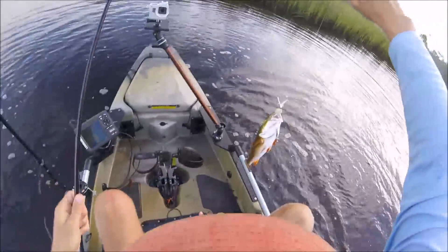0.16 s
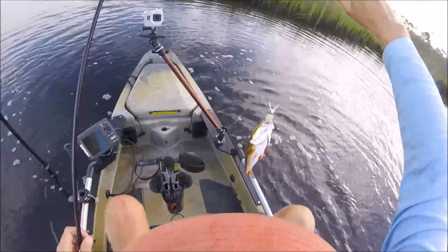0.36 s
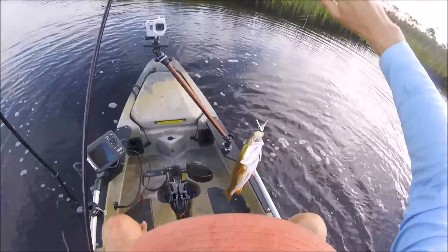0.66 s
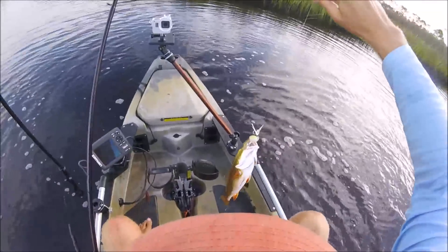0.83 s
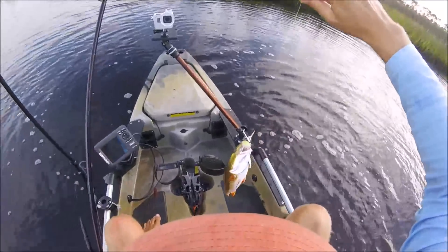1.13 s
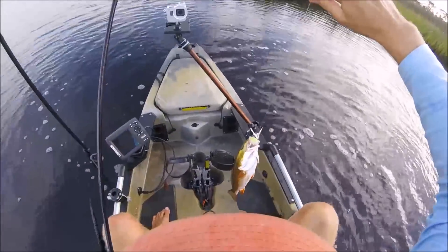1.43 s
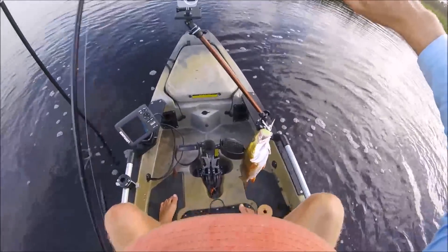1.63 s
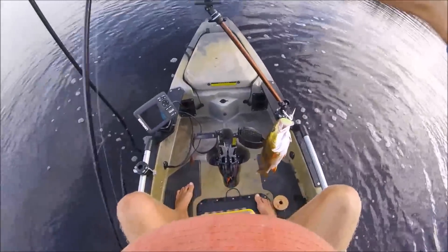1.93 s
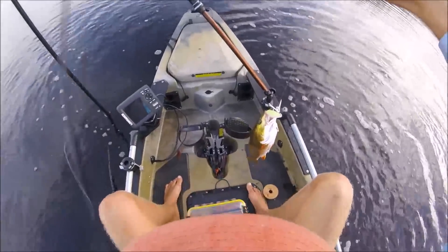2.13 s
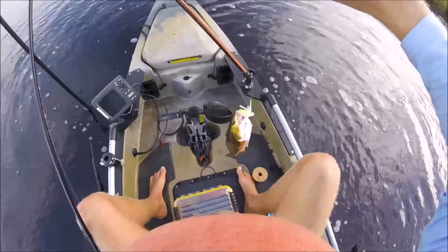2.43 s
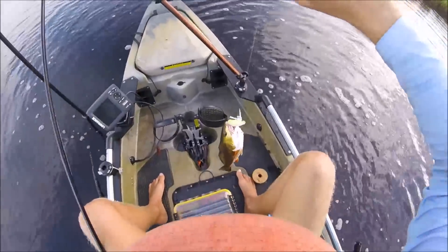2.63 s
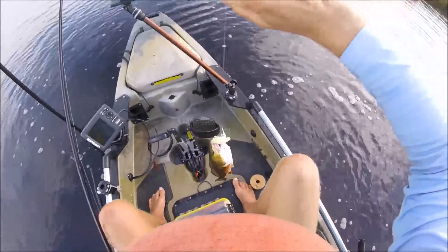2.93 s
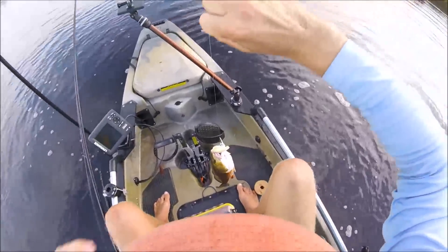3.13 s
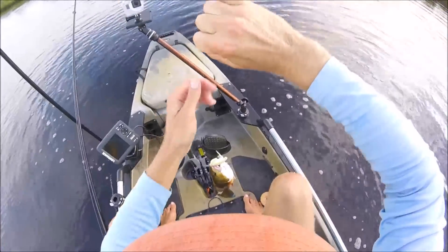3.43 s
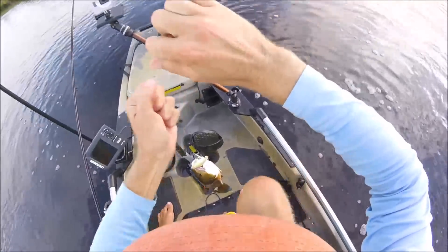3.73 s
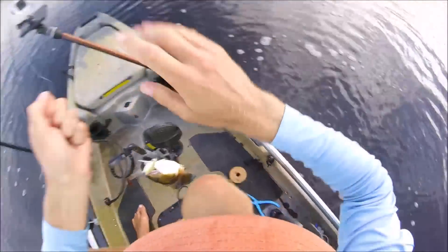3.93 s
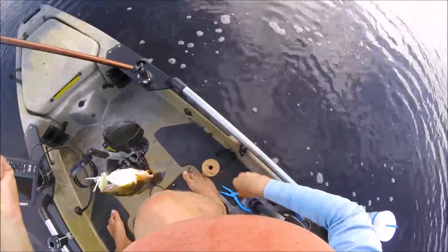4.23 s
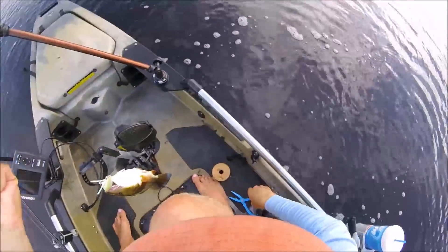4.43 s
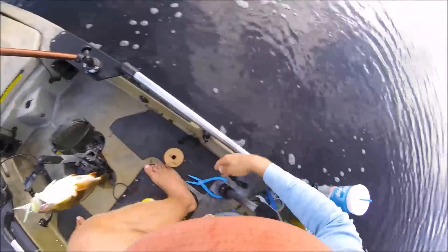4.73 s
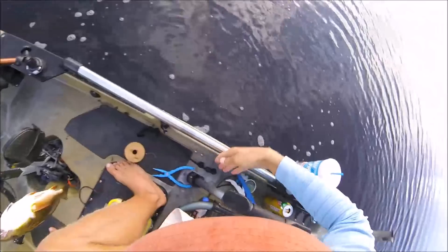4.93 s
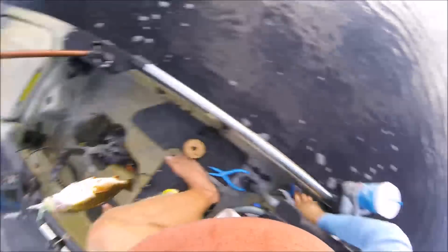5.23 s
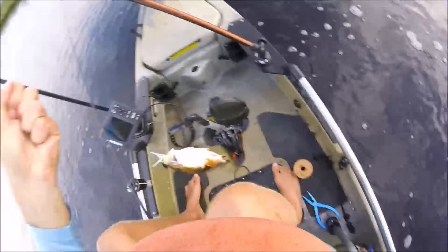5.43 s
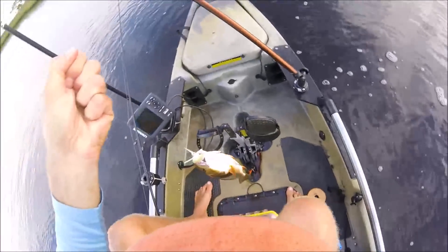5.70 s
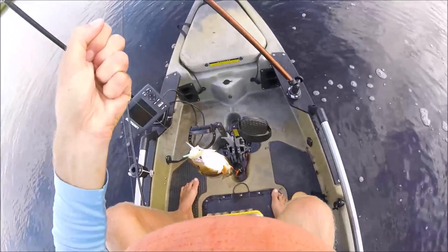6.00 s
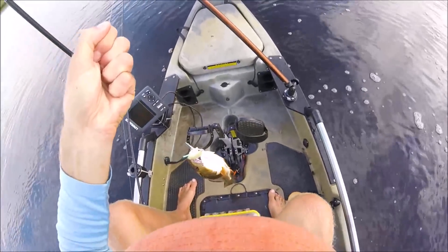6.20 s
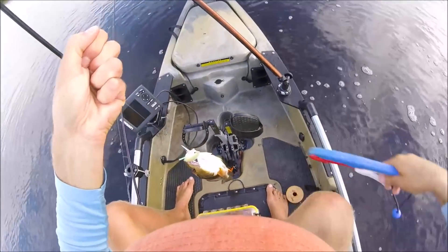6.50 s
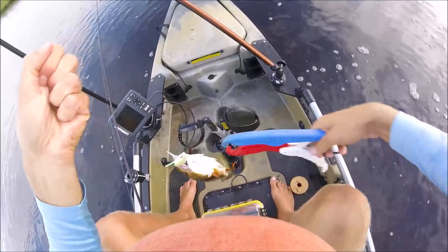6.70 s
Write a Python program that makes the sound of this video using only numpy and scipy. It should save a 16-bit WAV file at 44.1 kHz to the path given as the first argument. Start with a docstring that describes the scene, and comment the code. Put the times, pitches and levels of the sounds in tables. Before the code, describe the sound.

A close, dry mono camera microphone on a plastic kayak outdoors. Low wind rumble comes and goes in uneven gusts, with fluttering buffets, strong near 0.3, 1.8, 3.5 and 5.3 seconds, over a faint steady hiss. From 0.05 to 0.5 s, tackle raps and soft fleshy thumps shake the hollow hull, with scuffs and tiny steel tinkles. It is mostly windy until a small clack at 1.7, then another cluster of thumps, gritty slides and light jingling from 1.87 to 2.6. Sparse faint knocks follow to 3.4. At 4.0 to 4.4 comes the heaviest bumping, deep and hollow, with a dragging scuff. Lighter knocks and short scuffs run from 5.57 to 5.95. At 6.01 a hard, bright plastic clack raps the hull; at 6.25 a steel fitting gives a clear high beating ting. A faint click at 6.5 and tiny ticks near 6.7 end it under quiet rumble and hiss.

```python
"""A fish, feet and tackle knock and scuff the hollow hull of a plastic kayak: rough forces ring its resonances.
Some blows leave a short clear note, a damped sine. A small steel fitting tinkles with close modes that beat,
and a stiff plastic piece clacks through narrow modes under a bright snap. Gusts buffet the microphone port
of a camera in its housing: filtered noise makes rumble and flutter, single pressure swings make the buffets.
Its preamp hisses: coloured noise, nearly steady. The very top of the treble is cut."""
import sys
import numpy as np
from scipy import signal
from scipy.fft import rfft, irfft, next_fast_len
from scipy.io import wavfile
from scipy.ndimage import uniform_filter1d

SR = 44100
rng = np.random.default_rng(int(sys.argv[2]) if len(sys.argv) > 2 else 0)


def to_wav(s):
    """Save 16-bit WAV."""
    ch = np.atleast_2d(s).T  # columns
    pcm = np.round(np.clip(ch, -1, 1) * 32767)  # PCM
    wavfile.write(sys.argv[1], SR, pcm.astype(np.int16))


N = 302465  # length in samples


def undb(db):
    """Decibels to gain."""
    return 10 ** (np.asarray(db) / 20)


def unit(x):
    """Scale to rms 1."""
    return x / np.sqrt(np.mean(x ** 2))


def noise():
    """White noise over the whole scene."""
    return rng.standard_normal(N)


def band(x, hz, width_hz):
    """One resonance, gain 1 at its centre."""
    return signal.lfilter(*signal.iirpeak(hz, hz / width_hz, SR), x)


def track(rows, column):
    """A table column at every sample, in straight lines between the rows."""
    rows = np.array(rows)
    return np.interp(np.arange(N) / SR, rows[:, 0], rows[:, column])


def walk(rate):
    """Random levels of rms 1, held 1 / rate seconds and smoothed twice."""
    k = int(SR / rate)
    steps = np.repeat(rng.standard_normal(N // k + 1), k)
    smooth = uniform_filter1d(uniform_filter1d(steps, k), k)
    return unit(smooth[:N])


# How the wind comes and goes.
# Each row: time in seconds, rumble level in dB, flutter level relative to the rumble in dB.
GUST_LEVELS = [(0, -39, -10.5), (0.25, -32.5, 0.5), (0.6, -48, -9), (0.95, -41, -23.5), (1.4, -36, -16.5),
               (1.85, -33, -10), (2.35, -38.5, 0), (2.78, -44, -21.5), (3.0, -33.5, -21.5),
               (3.2, -51, -4.5), (3.6, -33, -30.5), (4.0, -45.5, -36), (4.3, -37.5, -6), (4.55, -47, -12),
               (5.08, -48, -25), (5.16, -43.5, 4), (5.33, -33.5, -2), (5.46, -41, -5.5), (5.56, -42.5, -54),
               (6.86, -44, -42)]
EDDY_DB, EDDY_SPREAD_DB = -1, 4  # chance eddies: least level over the rumble, and its spread
EDDY_LOW_HZ, EDDY_OCTAVES = 40, 1.71  # lowest pitch, and the range above it
EDDY_TAIL = .85  # under 1, so that there is a limit to how strong a chance eddy can be


def eddies(count):
    """Chance buffets that follow the gust of the moment: rows of seconds, level in dB, pitch in Hz."""
    when, size, pitch = rng.random((count, 3)).T
    s = when * (N - 1) / SR
    gust_db = track(GUST_LEVELS, column=1)[(s * SR).astype(int)]
    db = gust_db + EDDY_DB - EDDY_SPREAD_DB * np.log(1 - EDDY_TAIL * size)
    return list(zip(s, db, EDDY_LOW_HZ * 2 ** (EDDY_OCTAVES * pitch)))


# The strongest buffets of air on the port.
# Each row: time of the swing's middle in seconds, level in dB before the skew, pitch in Hz.
STRONG_BUFFETS = [(0.076, -25, 81.6), (0.256, -16, 61.7), (0.279, -16.5, 52), (0.825, -27, 48),
                  (1.178, -32, 68), (1.240, -31, 74), (1.317, -22, 93), (1.390, -22, 97),
                  (1.565, -21, 46.7), (1.644, -26, 52.7), (1.716, -22.5, 58.7), (1.777, -27, 97),
                  (1.784, -19.5, 70.6), (1.829, -27.5, 75.4), (2.29, -23.5, 128), (2.385, -28, 50.3),
                  (2.976, -25.5, 48), (3.06, -31, 44), (3.53, -12.5, 67), (3.64, -19, 62.5),
                  (4.289, -23.5, 67), (4.416, -30, 82), (5.167, -27, 92), (5.238, -34.5, 80),
                  (5.280, -28, 80), (5.303, -21, 95), (5.322, -24, 105), (5.333, -20.5, 133),
                  (5.37, -29, 99.5), (5.415, -26, 94), (6.401, -29.5, 61), (6.607, -31, 36.4)]
BUFFET_RISE, BUFFET_FALL = 0.35, 0.68  # in cycles
PORT_SKEW = 2.5  # strong pressure swings come out peaked on one side (per unit of pressure)


def wind():
    """Turbulence at the port: lumpy rumble, a flutter above it and single pressure buffets."""
    rumble = unit(band(noise(), 29.7, 26.5) * undb(4.64 * walk(14)))
    rumble = unit(band(band(rumble, 42., 110.), 42., 110.))
    flutter = unit(band(noise(), 100.0, 116.0) * undb(4.2 * walk(40)))
    flutter = unit(band(band(flutter, 127.0, 222.0), 127.0, 222.0))
    gust = undb(track(GUST_LEVELS, column=1))
    pressure = gust * (rumble + undb(track(GUST_LEVELS, column=2)) * flutter)
    for s, db, hz in STRONG_BUFFETS + eddies(count=70):
        # an eddy passes: about one and a half swings of pressure, sudden at the front
        t = np.arange(-SR // 20, SR // 20) / SR
        i = int(s * SR) - SR // 20
        shape = np.exp(-(t * hz / np.where(t < 0, BUFFET_RISE, BUFFET_FALL)) ** 2)
        swing = -undb(db) * np.cos(2 * np.pi * hz * t) * shape
        lo, hi = max(i, 0), min(i + len(t), N)
        pressure[lo:hi] += swing[lo - i:hi - i]
    peaked = pressure ** 2
    return pressure + PORT_SKEW * (peaked - uniform_filter1d(peaked, size=SR // 25))


# The colour of the hiss. Each row: frequency in Hz, relative level in dB per Hz.
HISS_COLOUR = [(59, 0.5), (100, -10.5), (295, -16), (625, -20.5), (2130, -26.5), (4160, -35), (5340, -35),
               (6300, -14), (7000, -26), (8800, -29), (10400, -38.5), (12000, -34.5), (14500, -48)]
HISS_DB = -62


def hiss():
    """Nearly steady microphone and preamp noise, lifted where the housing port resonates."""
    hz, db = np.transpose(HISS_COLOUR)
    size = next_fast_len(N)
    grid = np.arange(size // 2 + 1) * SR / size + 1  # 1 Hz up, to keep the logarithm finite
    colour = undb(np.interp(np.log(grid), np.log(hz), db, -120, -120))
    coloured = irfft(rfft(rng.standard_normal(size)) * colour, size)[:N]
    return undb(HISS_DB + 0.5 * walk(4.0)) * unit(coloured)


AFTER_DB, AFTER_S = -30.5, 0.037  # a faint shudder goes on after each blow


def contacts(times, dbs, lengths):
    """Force of each blow: a hard first touch, a chatter that swells quickly and dies away, a faint shudder."""
    force = np.zeros(N)
    for s, db, length in zip(times, dbs, lengths):
        i = int(s * SR)
        t = np.arange(min(SR // 6, N - i)) / SR
        chatter = (1 - np.exp(-t / (0.18 * length))) * np.exp(-t / length)
        touch = 1.16 * np.exp(-t / 0.00036)
        shudder = undb(AFTER_DB) * np.exp(-t / AFTER_S)
        force[i:i + len(t)] += undb(db) * (chatter + touch + shudder)
    return force


def swells(start, hold, db, rise_db_s, fall_db_s):
    """Gain of gestures that rise to their start, hold and fall away."""
    t = np.arange(N)[:, None] / SR
    rise_db = rise_db_s * np.maximum(start - t, 0)
    fall_db = fall_db_s * np.maximum(t - start - hold, 0)
    return undb(db - rise_db - fall_db).sum(axis=1)


SLIPS_PER_S, SLIP_SPREAD_DB, SLIP_S = 450, 4, 0.0023  # grabs: average rate, spread of strength, decay time


def slips():
    """Stick-slip force: separate short grabs, a few of them large; rms 1."""
    when, size = rng.random((2, N))
    grabs = (when < SLIPS_PER_S / SR) * undb(-SLIP_SPREAD_DB * np.log(1 - .98 * size))
    return unit(signal.lfilter([1], [1, -np.exp(-1 / (SLIP_S * SR))], grabs))


# Fish and feet thump the deck. Each row: time in seconds, deck strength in dB,
# hollow body minus deck in dB, crack minus deck in dB, basic chatter time in seconds.
FLESH_THUMPS = [(0.121, -54, 17, -2, 0.013), (0.176, -45, 17, -17, 0.004), (0.241, -34, 1, -20, 0.0053),
                (0.257, -29.5, -17, -3.5, 0.0074), (0.291, -21, -7.5, -6.5, 0.011),
                (0.436, -38.5, -7, -16, 0.02), (0.473, -25.5, -0.5, -12.5, 0.0089),
                (0.49, -29.5, 6.5, -12, 0.0024), (1.62, -42, -1.5, -4.5, 0.013),
                (1.875, -28, 2.5, -6.5, 0.014), (1.974, -42.5, 0, -1.5, 0.018),
                (1.995, -52, 18.5, 2, 0.017), (2.019, -39, -4, -9, 0.0025), (2.167, -35, 2, 4.5, 0.0069),
                (2.179, -32, 7, 3, 0.013), (2.222, -36.5, 6, -15, 0.019), (2.247, -25, -24, -1.5, 0.0074),
                (2.428, -33.5, -3.5, 0.5, 0.0052), (2.694, -61, 20.5, 1, 0.024),
                (2.891, -43, -1, -33, 0.017), (2.985, -48.5, 9, -2, 0.015), (3.281, -51, 4.5, -16, 0.015),
                (3.353, -44.5, 3, -14, 0.0099), (4.007, -47, 16, 5, 0.022), (4.078, -35, 7.5, -2.5, 0.0049),
                (4.107, -23, -1, -35, 0.0045), (4.113, -21, -2, 0, 0.01), (4.178, -28.5, 6, -21, 0.0076),
                (4.206, -32, -7, -29, 0.0089), (4.25, -30, -18, -28, 0.004), (4.274, -30.5, -9, -13, 0.011),
                (4.325, -39, 3.5, -21, 0.0044), (4.372, -33, -5.5, -12, 0.012),
                (4.4, -36, 6.5, -16, 0.0046), (4.545, -45, -12, -4, 0.012), (4.679, -47, -6.5, -8, 0.012),
                (5.57, -54, 19, -8, 0.0049), (5.578, -38, -1, -18, 0.0086), (5.628, -30.5, -2, -29, 0.008),
                (5.657, -42.5, -2, -7.5, 0.003), (5.754, -38, -1, -25, 0.012),
                (5.905, -41.5, -2, -30, 0.01), (5.916, -39.5, -9, -22, 0.0084),
                (5.938, -45, 10.5, -24, 0.0032)]
THUMP_SPOT_HZ = 730  # soft flesh lands on the broad middle of a plate
# Hard tackle raps the hull. Each row: time in seconds, deck strength in dB,
# crack minus deck in dB, pitch of the struck spot in Hz, basic chatter time in seconds.
TACKLE_RAPS = [(0.06, -27.5, -3, 1020, 0.0055), (0.148, -44, 3, 6300, 0.01), (0.206, -48, 1, 4640, 0.029),
               (0.34, -41, -5, 4500, 0.0087), (1.187, -43, -11, 1380, 0.0065),
               (1.703, -47.5, 2, 1140, 0.014), (1.756, -45.5, -14, 680, 0.0048),
               (1.866, -26.5, -2, 7740, 0.0062), (2.278, -52, 14, 654, 0.0077),
               (2.299, -48, -4, 1080, 0.0057), (2.435, -39.5, 1.5, 5540, 0.0085),
               (2.495, -50.5, 0, 4480, 0.0071), (2.567, -46, 4.5, 1930, 0.0067),
               (2.734, -47, -1.5, 5900, 0.0072), (3.183, -56, 3, 4300, 0.015),
               (4.025, -39.5, -1, 830, 0.0054), (4.188, -24, -17, 785, 0.0091),
               (5.597, -26, -14, 2740, 0.0067), (5.704, -40.5, -4, 720, 0.01),
               (5.734, -43, -18, 1070, 0.0059), (6.014, -18.5, -1, 790, 0.0094),
               (6.249, -27, 1, 4180, 0.0074), (6.526, -64, 13, 5500, 0.0085)]
RAP_BODY_DB = -4.5  # hollow body minus deck


def knocks():
    """Thumps and raps as one list: s, deck dB, body dB, crack dB, spot Hz, chatter s, hard (0 or 1)."""
    thumps = [(s, db, body, crack, THUMP_SPOT_HZ, chatter, 0) for s, db, body, crack, chatter in FLESH_THUMPS]
    raps = [(s, db, RAP_BODY_DB, crack, hz, chatter, 1) for s, db, crack, hz, chatter in TACKLE_RAPS]
    return np.transpose(thumps + raps)


def ring(modes, s, db, chatter, spot_hz, rub, favour_db=13.0, reach=0.23, strike_db=12.5):
    """A blow favours modes near the pitch of its spot: one clean strike for all, a rough force for each."""
    total = np.sqrt(sum(undb(mode_db) ** 2 * width / SR for _, width, mode_db in modes))
    out = 0
    for hz, width, mode_db in modes:
        felt_db = db + favour_db * np.exp(-(np.log(hz / spot_hz) / reach) ** 2)
        force = (contacts(s, felt_db, chatter) + rub) * noise()
        force[(s * SR).astype(int)] += undb(felt_db + strike_db)
        # a wide second pass keeps the flanks steep
        out = out + undb(mode_db) * band(band(force, hz, width), hz, 0.5 * hz)
    return out / total


# Resonances of the hollow body, the deck plates and their bright edges.
# Each row: frequency in Hz, width in Hz, relative level in dB.
BODY_MODES = [(185.3, 142, 9), (269, 27, 5), (310, 82, 4.5), (464, 178, 1), (501.5, 107, 0.5),
              (592, 690, -9.5)]
DECK_MODES = [(779, 85, 1), (996, 690, 3), (1230, 36, -3.5), (1693, 760, -1.5), (1956, 88, -3.5)]
EDGE_MODES = [(2460, 650, 10), (3090, 1500, 10.5), (3640, 1400, -11.5), (4950, 710, 12), (5600, 460, 12.5),
              (6335, 390, 15.5), (7740, 800, -2), (9200, 430, -35)]
# Slides over the deck. Each row: start in seconds, hold in seconds, body scuff strength in dB,
# deck plates minus scuff in dB, grit minus scuff in dB.
DECK_SLIDES = [(0.12, 0.18, -42.5, -14, -1), (0.33, 0.12, -53.5, -4, -22), (1.89, 0.09, -64, -10, -9),
               (2.19, 0.093, -44, -4, -3), (2.264, 0.078, -50, -8, 9.5), (2.451, 0.023, -42, -13, -1),
               (2.582, 0.023, -43.5, -28, -7), (3.957, 0.032, -46.5, -17.5, -11),
               (4.134, 0.16, -36.5, -11, -20), (4.388, 0.07, -50.5, -8.5, -15), (5.6, 0.054, -53, -4, -16),
               (5.732, 0.069, -45.5, -10, -7.5), (5.895, 0.045, -38.5, -16.5, -22)]
SLIDE_RISE_DB_S, SLIDE_FALL_DB_S = 214, 188
RAP_BODY_HZ, RAP_FAVOUR_DB = 555, -1  # raps favour body modes near this pitch, a little less strongly


def hull():
    """Knocks and scuffs shake the hollow body, the deck plates and their bright edge modes."""
    s, deck_db, body_db, crack_db, spot_hz, chatter, hard = knocks()
    start, hold, scuff_db, plate_db, grit_db = np.transpose(DECK_SLIDES)
    chatter = np.maximum(chatter, .001)

    def sliding(db):
        return swells(start, hold, db, SLIDE_RISE_DB_S, SLIDE_FALL_DB_S)

    # sliding is stick-slip: a force that comes in lumps, a few of them large
    scuff = undb(6.7 * walk(80) - 11.5) * sliding(scuff_db)
    # plates and edges feel the single grabs
    drag = slips() * undb(-10.0) * sliding(scuff_db + plate_db)
    grit = slips() * undb(-6.0) * sliding(scuff_db + grit_db)
    # the big soft body is pushed for longer than the stiff parts; a longer thump favours its deeper modes
    body_hz = np.where(hard, RAP_BODY_HZ, 3.73 / chatter)
    body = ring(BODY_MODES, s, deck_db + body_db - 8.5, 1.64 * chatter, body_hz, undb(-0.5) * scuff,
                favour_db=6.0 + RAP_FAVOUR_DB * hard, reach=0.92, strike_db=14.5)
    deck = ring(DECK_MODES, s, deck_db - 12.5, chatter, spot_hz, drag, favour_db=5.5 + 9.3 * hard)
    crack = ring(EDGE_MODES, s, deck_db + crack_db - 8.0, 0.62 * chatter, spot_hz, undb(-20.0) * grit,
                 strike_db=-24.0)
    return body + deck + crack


# Modes of the steel fitting.
# Each row: frequency in Hz, relative level in dB, full ring time in seconds (to fall 60 dB).
STEEL_MODES = [(4380.5, 0, .34), (4403.5, 1, .21), (4434, -7, .16), (4475, -12, .06), (4585, -1, .05),
               (4850, -5, .04)]
# Modes of the rim, just above the main pair: lowest and highest frequency in Hz.
RIM_RANGE_HZ = (4420, 4520)


def steel_modes(force, rim_force, free):
    """Damped swings of the fitting; free = share of the ring time left when something touches it."""
    out = 0
    for hz, db, t60 in STEEL_MODES:
        pole = np.exp(2j * np.pi * hz / SR - np.log(1000) / (free * t60 * SR))
        push = rim_force if RIM_RANGE_HZ[0] < hz < RIM_RANGE_HZ[1] else force
        out = out + undb(db) * signal.lfilter([1], [1, -pole], push).imag
    return out


# Taps that set the fitting ringing. Each row: time in seconds, strength in dB.
STEEL_TAPS = [(0.0602, -31), (0.148, -47), (0.228, -39), (0.293, -34), (0.492, -48), (1.8622, -42),
              (1.9745, -47.5), (2.149, -44.5), (2.241, -38.5), (2.427, -46.5), (2.565, -53), (2.7377, -52),
              (2.983, -51), (6.2528, -18.5)]
# The fitting is shaken against the tackle.
# Each row: start in seconds, hold in seconds, ring level in dB, level of the rough rattle around it in dB.
STEEL_SHAKES = [(0.133, 0.11, -67, -58.5), (2.185, 0.069, -59, -62), (4.016, 0.024, -53.5, -62),
                (6.165, 0.008, -59, -75)]
SHAKE_RISE_DB_S, SHAKE_FALL_DB_S = 289, 150


def steel():
    """Close modes beat after a clean tap; shaken, the fitting is damped and jingles roughly."""
    s, db = np.transpose(STEEL_TAPS)
    taps = np.zeros(N)
    taps[(s * SR).astype(int)] = undb(db - 10.5)
    # a tap passes through the springy ring that holds the fitting, so it builds over a few ms
    taps = band(taps, 4516.0, 400.)
    jolts = slips() * noise()
    # shaking favours the rim
    shake = unit(steel_modes(jolts, undb(12.5) * jolts, 0.75))
    rough = undb(2.6 * walk(90)) * noise()
    rattle = unit(band(band(rough, 4580.0, 260.0), 4700.0, 330.0))
    start, hold, ring_db, rattle_db = np.transpose(STEEL_SHAKES)

    def shaken(level_db):
        return swells(start, hold, level_db, SHAKE_RISE_DB_S, SHAKE_FALL_DB_S)

    return steel_modes(taps, taps, 0.92) + shake * shaken(ring_db) + rattle * shaken(rattle_db)


# After some blows the struck patch sounds a short clear note of its own.
# Each row: start in seconds, level in dB before the fade, resting pitch in Hz, ring time in seconds (to fall 60 dB).
PATCH_NOTES = [(0.066, -25, 461, 0.064), (0.150, -25.5, 312, 0.033), (0.177, -26, 283, 0.064),
               (0.243, -23.5, 328, 0.023), (0.305, -23, 190, 0.041), (0.490, -29, 423, 0.03),
               (1.193, -41, 458, 0.058), (1.879, -23.5, 332, 0.038), (2.005, -28.5, 259, 0.058),
               (2.180, -20, 196, 0.11), (2.220, -22, 218, 0.04), (2.226, -44, 1830, .04),
               (2.248, -31.5, 1950, 0.037), (2.250, -18, 196, 0.052), (2.440, -37.5, 477, 0.055),
               (2.895, -44, 483, 0.075), (4.024, -44.5, 1856, 0.099), (4.078, -27, 610, 0.026),
               (4.093, -35, 1830, 0.029), (4.106, -10, 374, 0.019), (4.116, -31, 2250, 0.084),
               (4.138, -31, 1930, .03), (4.140, -17.5, 176, 0.099), (4.187, -16, 724, 0.042),
               (4.204, -46, 260, 0.056), (5.597, -29, 960, 0.031), (5.703, -36, 2590, 0.031),
               (5.904, -33, 340, 0.15), (5.939, -40, 1180, .02), (6.014, -19, 536, 0.049),
               (6.0142, -11, 1174, 0.022), (6.687, -47, 2050, 0.036), (6.796, -47, 2070, 0.023)]
NOTE_RISE_CYCLES, NOTE_SAG = 0.14, 0.032  # how soon a note speaks; share by which it starts above its pitch


def notes():
    """Each note is one damped swing that starts a little sharp."""
    out = np.zeros(N)
    for s, db, hz, t60 in PATCH_NOTES:
        i = int(s * SR)
        t = np.arange(min(SR // 8, N - i)) / SR
        fade = 1000. ** (-t / t60)
        turns = hz * (t + NOTE_SAG * t60 * (1 - fade) / np.log(1000))
        rise = 1 - np.exp(-t * hz / NOTE_RISE_CYCLES)
        out[i:i + len(t)] += undb(db) * rise * fade * np.sin(2 * np.pi * turns)
    return out


# A stiff plastic piece clacks. Each row: time in seconds, strength in dB, chatter time in seconds.
PLASTIC_CLACKS = [(1.692, -58, 0.0088), (1.702, -53, 0.0078), (6.014, -27, 0.0038), (6.531, -48.5, 0.008)]
# Its modes. Each row: frequency in Hz, relative level in dB.
PLASTIC_MODES = [(1950, 4), (2460, 0.5), (2870, 4), (3580, 3.5), (4350, -2), (4830, 0.5), (5380, -3.5)]
PLASTIC_WIDTH_HZ = 147


def plastic():
    """A rough contact rings the narrow modes of the piece, each in its own way, under a thin bright snap."""
    force = contacts(*np.transpose(PLASTIC_CLACKS))
    out = undb(-9.0) * band(force * noise(), 12200.0, 2100.0)  # the snap
    for hz, db in PLASTIC_MODES:
        out = out + undb(db + 17.0) * band(force * noise(), hz, PLASTIC_WIDTH_HZ)
    return out


def scene():
    """All sources at one microphone."""
    return (wind() + hiss() + hull() + steel() + notes() + plastic())[None]


TOP_HZ = 14200


def record(dry):
    """The camera cuts the top with a steep low-pass filter."""
    return signal.sosfilt(signal.ellip(8, .2, 70, TOP_HZ, fs=SR, output="sos"), dry)


dry = scene()
out = record(dry)
to_wav(out)
```